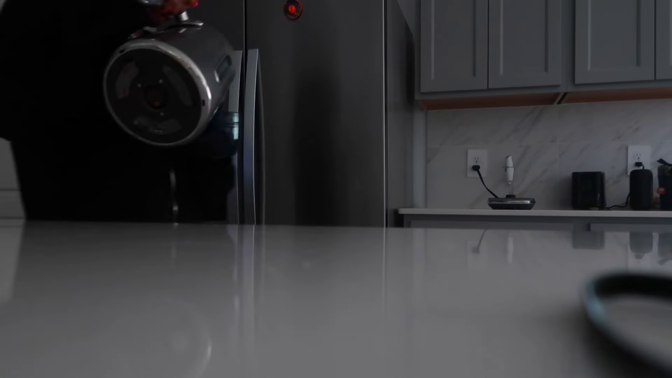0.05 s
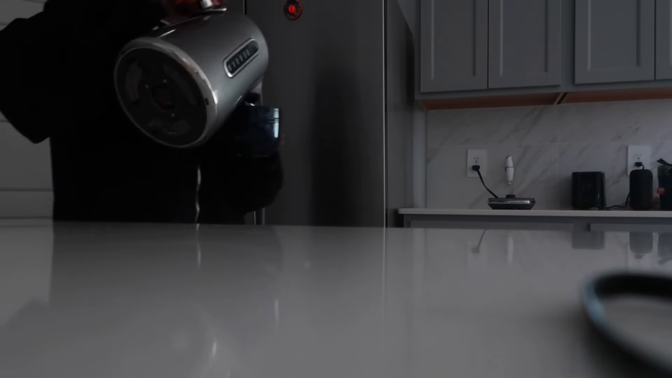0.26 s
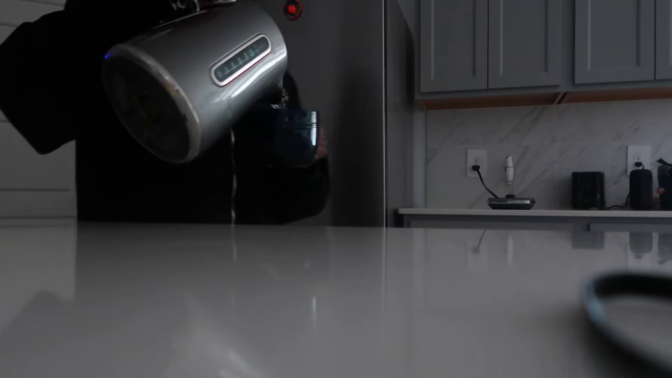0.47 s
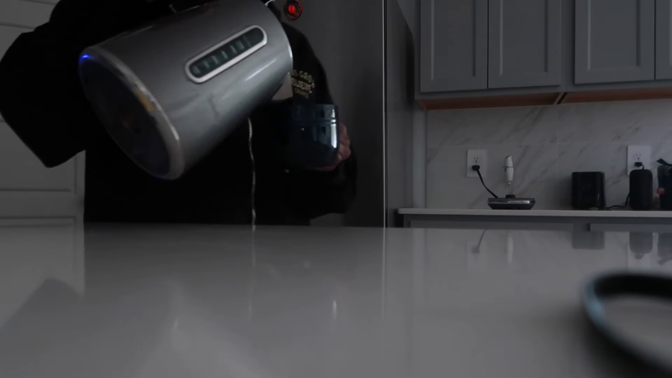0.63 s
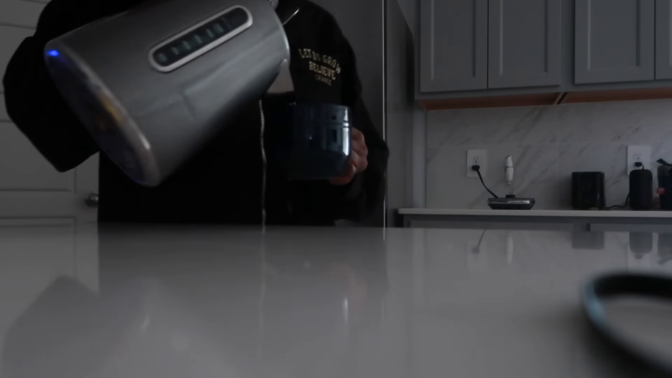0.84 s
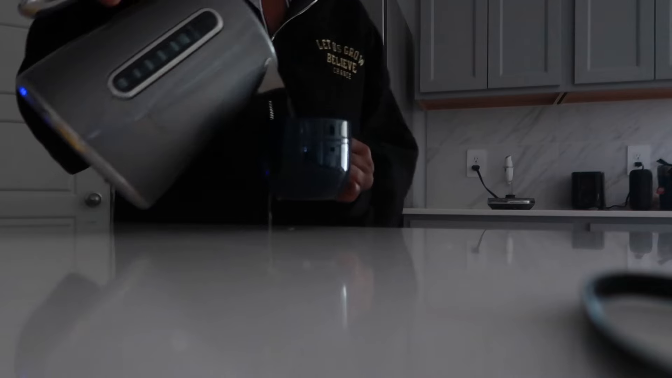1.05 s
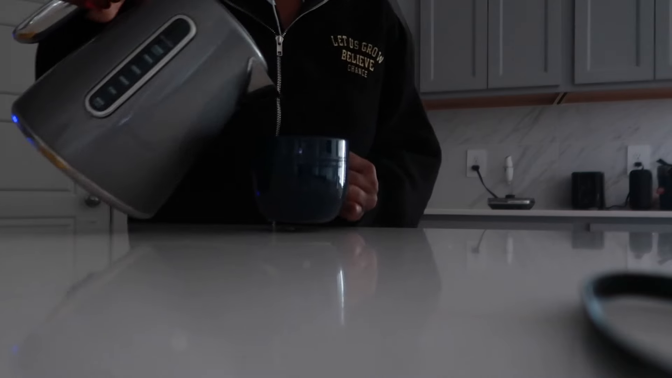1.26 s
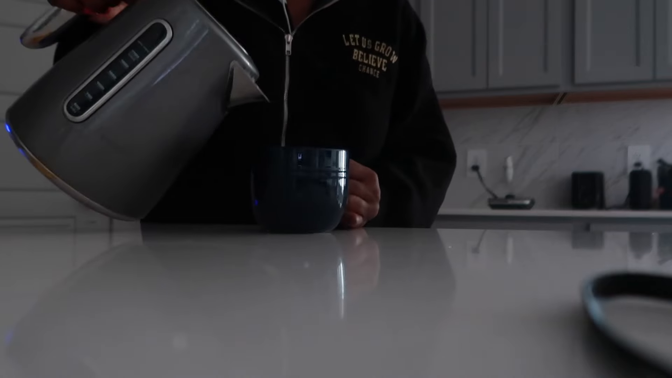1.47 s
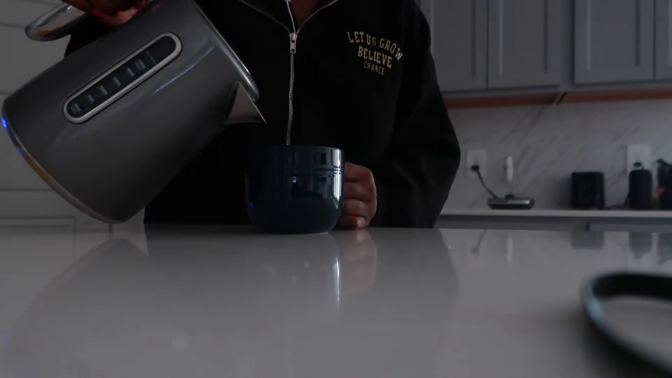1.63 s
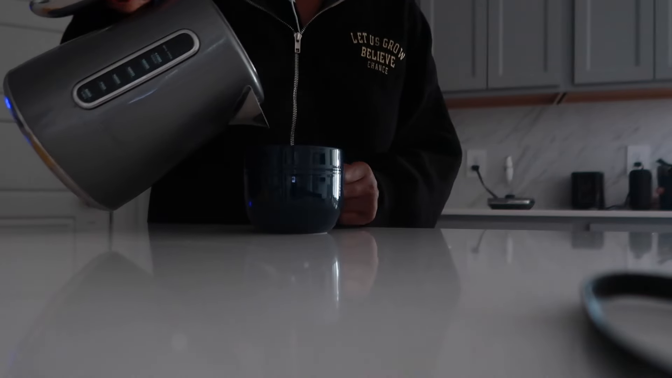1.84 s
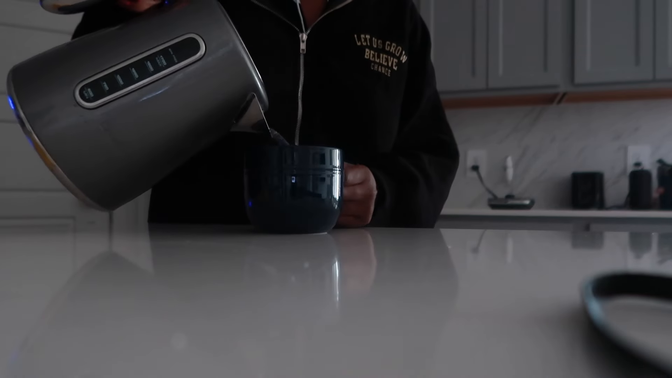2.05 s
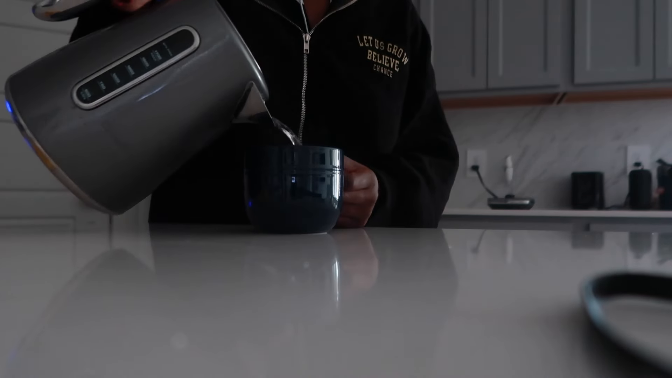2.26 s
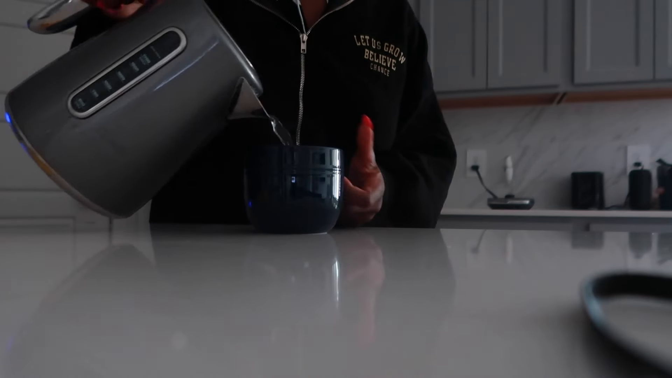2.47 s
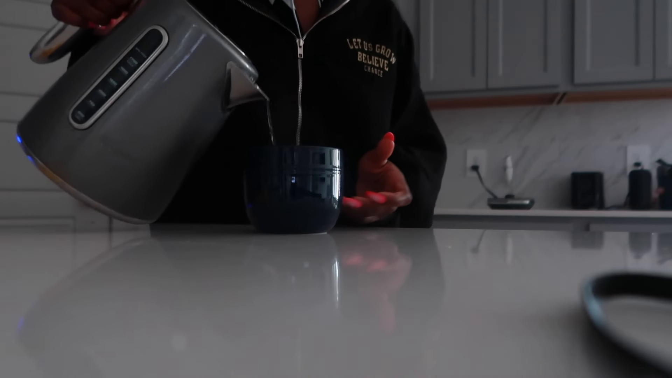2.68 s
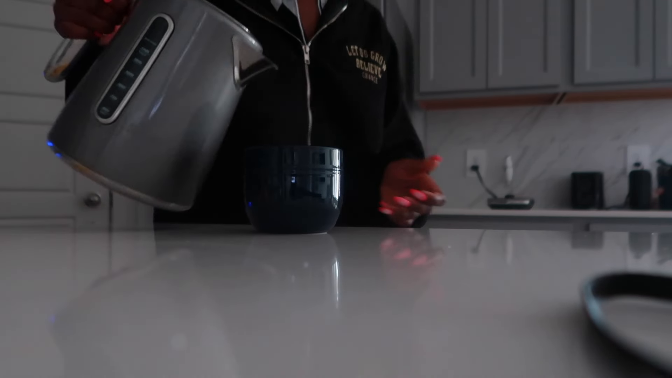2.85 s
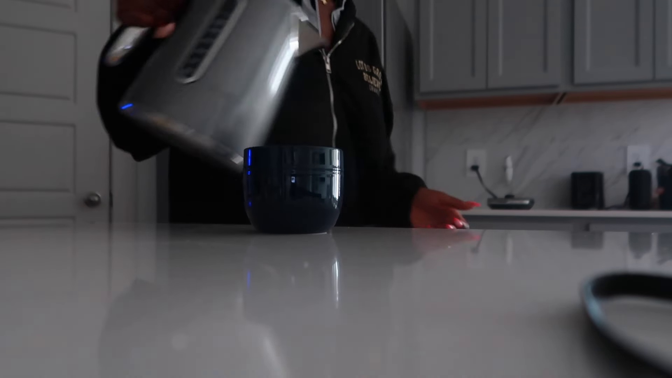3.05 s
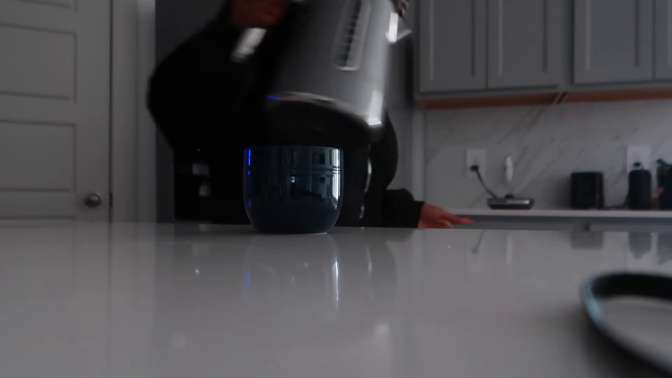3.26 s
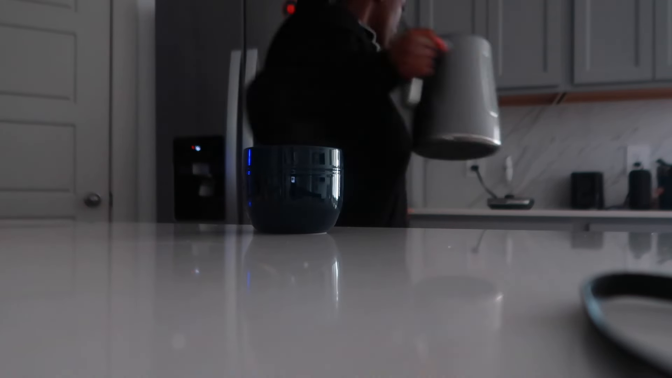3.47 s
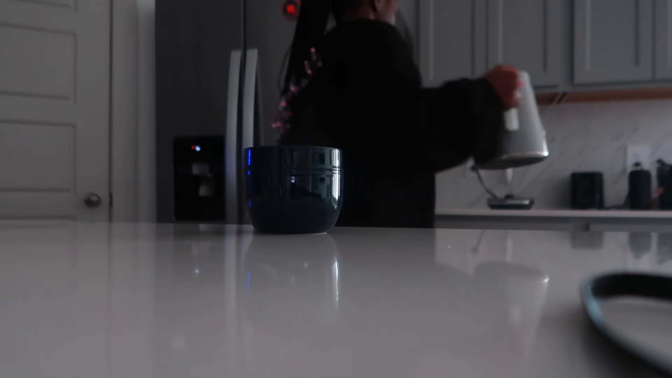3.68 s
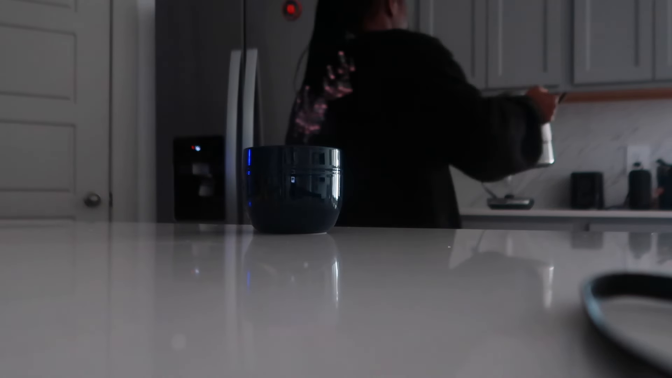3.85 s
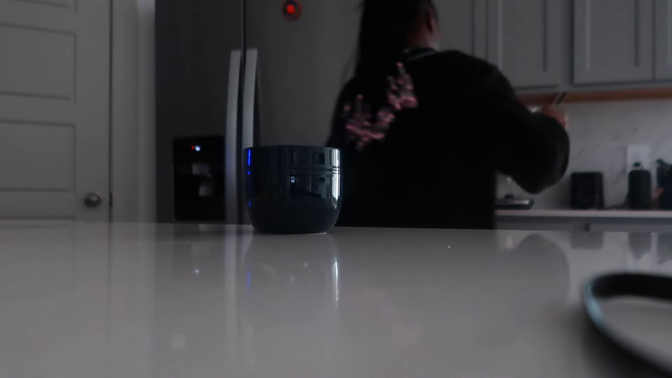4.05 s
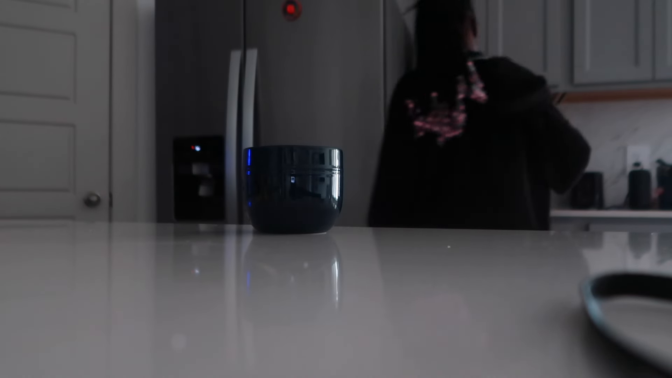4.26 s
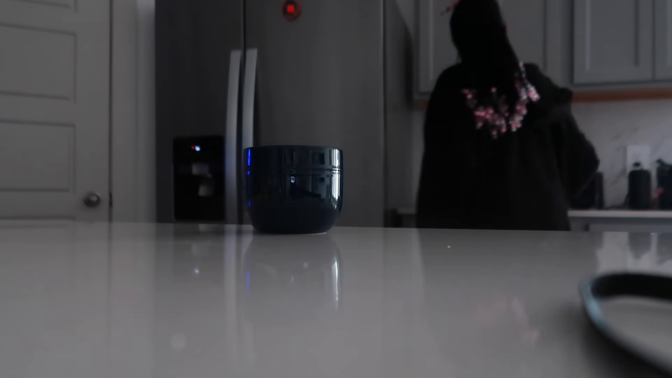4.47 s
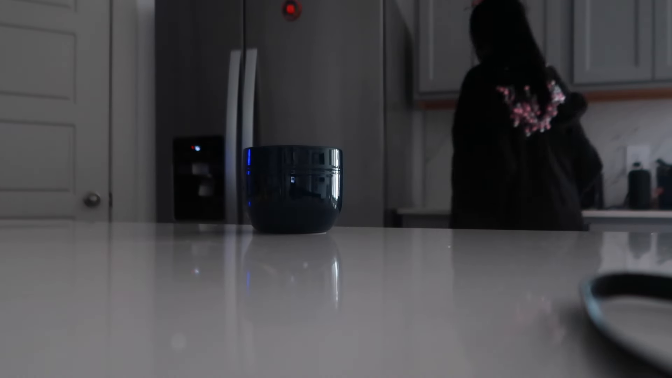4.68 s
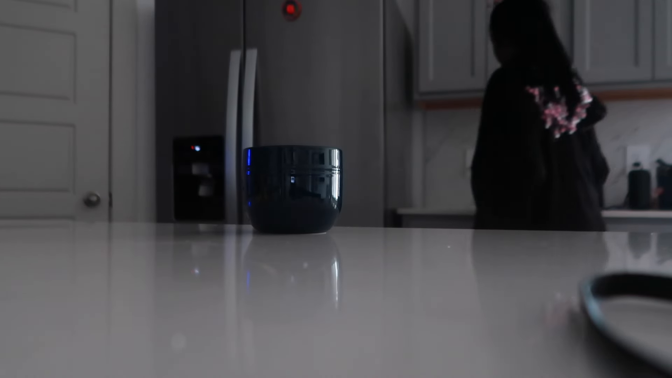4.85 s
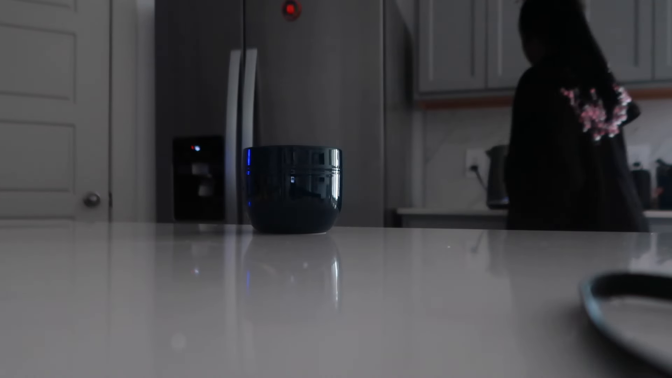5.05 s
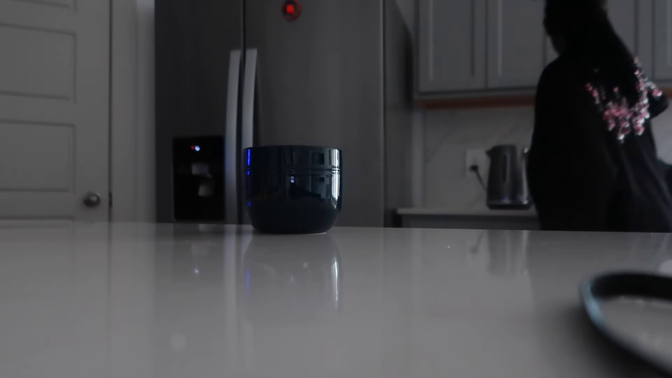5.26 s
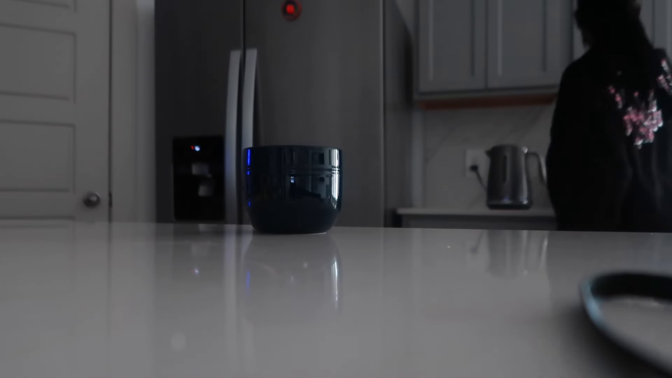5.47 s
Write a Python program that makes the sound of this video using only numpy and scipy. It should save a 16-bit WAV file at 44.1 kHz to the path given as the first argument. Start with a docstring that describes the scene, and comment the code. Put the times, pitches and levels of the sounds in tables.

```python
"""Water glugs in a tipped kettle and drips close by over room tone; the spout knocks a held mug, which lands
and rocks on a stone counter beside the microphone. More taps and drips follow, sleeves rustle, and the kettle
clatters onto its base across the hard-walled kitchen. Struck things are sums of decaying sines with coloured
noise bursts, bubbles are short gliding sines, cloth and rattle are grains and noise; a sparse echo tail makes
the room. A close microphone pair with gain control takes it all in."""
import sys
import numpy as np
from scipy import signal
from scipy.fft import rfft, irfft, next_fast_len
from scipy.io import wavfile
from scipy.ndimage import uniform_filter1d

SR = 44100
rng = np.random.default_rng(int(sys.argv[2]) if len(sys.argv) > 2 else 0)


def to_wav(sig):
    """Store sig (one row per channel, or 1-D mono) as 16-bit WAV at the path in sys.argv[1].

    Samples outside -1..1 are clipped; the rate is SR.
    """
    pcm = np.clip(np.atleast_2d(sig), -1, 1) * 32767
    pcm = np.round(pcm).astype(np.int16)
    wavfile.write(sys.argv[1], SR, pcm.T)  # frames by channels


N = 243431

# mug foot on the counter: (time [s], level [dB], contact [ms], ring level [dB])
LANDINGS = [(1.4031, -22, 0.023, -39), (1.4074, 12, 0.038, -2), (1.512, 0.5, 0.15, -9),
            (1.53, -6.5, 0.7, -38), (1.542, -8.5, 0.87, -33), (1.6056, -11.5, 0.96, -38),
            (1.634, -6, 0.42, -16.5), (1.652, -12.5, 0.52, -29), (1.681, -8, 0.42, -45),
            (1.691, -4, 0.16, -10.5), (1.7073, -1.5, 0.024, -12.5), (1.776, -19.5, 0.22, -31)]
# mug ringing freely: (frequency [Hz], level [dB], decay by 60 dB [s])
MUG_MODES = [(2051, -1, .28), (2239, 0, .37), (5235, -14, .26), (5577, -27, .9), (7900, -24, .3)]
# how far standing on its foot chokes each mug mode: (level [dB])
FOOT_DAMPS = [-25, 0, -25, -9, -25]


def amp(db):
    """Amplitude ratio of a level in dB."""
    return 10 ** (np.asarray(db, float) / 20)


def even(x):
    """Scale to an rms of 1."""
    return x / np.sqrt(np.mean(x ** 2) + 1e-20)


def peaked(x):
    """Scale to a peak of 1."""
    return x / abs(x).max()


def read(points, hz):
    """Read a table of (frequency, value) along a log frequency axis."""
    f, value = np.transpose(points)
    return np.interp(np.log(hz + 1), np.log(f + 1), value)


def curve(rows, column=1):
    """Gain along a dB column, silent outside its span."""
    rows = np.array(rows)
    return amp(np.interp(np.arange(N) / SR, rows[:, 0], rows[:, column], -200, -200))


def add(mix, s, sound):
    """Mix a sound in place, starting at s seconds."""
    part = mix[round(s * SR):][:len(sound)]
    part += sound[:len(part)]


def colour(x, spectrum):
    """Minimum-phase filter with the shape of the given dB spectrum, of energy 1."""
    hz = abs(np.fft.fftfreq(4096, 1 / SR))
    log_gain = np.log(amp(np.maximum(read(spectrum, hz), -100)))
    response = np.fft.ifft(np.exp(np.conj(signal.hilbert(log_gain)))).real[:2048]
    return signal.oaconvolve(x, response / np.linalg.norm(response))[:len(x)]


def ring(modes, extra_db=0, spread_db=0, shorten=1, flip=-1.055):
    """Decaying sines of alternate sign; the place of the blow shifts their balance."""
    hz, db, t60 = np.transpose(modes)[:, :, None]
    t = np.arange(SR // 2) / SR
    sign = flip ** np.arange(len(hz))[:, None]  # also lifts each next mode slightly
    db = db + np.reshape(extra_db, (-1, 1)) + spread_db * rng.standard_normal(hz.shape)
    decay = amp(db - 60 * t / (t60 * shorten))
    return peaked((sign * decay * np.sin(2 * np.pi * hz * t)).sum(0))


def soften(x, ms):
    """A blow lasts a while: longer contact rings the treble less."""
    return peaked(signal.lfilter([1], [1, -np.exp(-1000 / (SR * max(ms, .01)))], x))


def puff(t60, rise_s=0.000067, size=3000):
    """A short burst of noise that rises fast and decays."""
    t = np.arange(size) / SR
    return rng.standard_normal(size) * amp(-60 * t / t60) * (1 - np.exp(-t / rise_s))


def grains(per_s, spread_db):
    """Sparse clicks of uneven size."""
    size = amp(spread_db * np.minimum(rng.exponential(1, N), 4)) * rng.choice([-1, 1], N)
    return even(size * (rng.random(N) < per_s / SR))


def blow(t60, grit):
    """One sharp edge with a little grit behind it, nearly even across all pitches."""
    x = np.eye(1, 3000)[0] + grit * puff(t60)
    fade = amp(-9 * np.arange(3000) / (SR * t60))
    for _ in range(5):  # flatten the spectrum, then let it fade again
        z = rfft(x)
        x = irfft(z / (abs(z) + 1e-9)) * fade
    return x


def dying(x, t60):
    """Each value of x lingers and fades."""
    return signal.lfilter([1], [1, -amp(-60 / (t60 * SR))], x)


def pair(z, other, same):
    """Two channels that share the part `same` of their sound."""
    same = np.clip(same, -1, 1)[:, None]
    shared = np.sqrt((1 + same) / 2) * z
    rest = np.sqrt((1 - same) / 2) * other
    return np.array([shared + rest, shared - rest])


def air():
    """Room tone and microphone hiss: random short-time spectra with faint patches."""
    # room tone and hiss: (frequency [Hz], relative level [dB per Hz])
    tone = [(12, -40), (20, -17), (80, -0.5), (440, -7), (700, -10.5), (1130, -14), (2170, -18.5),
            (3540, -20.5), (7500, -28.5), (10000, -32), (12800, -44), (13400, -83)]
    # how alike left and right are: (frequency [Hz], likeness [-1 to 1])
    tone_same = [(40, 1), (130, 0.82), (290, 0.092), (1400, 0.035), (6000, 0.22), (9000, 1)]
    frames, hz = N // 256 + 5, np.fft.rfftfreq(1024, 1 / SR)
    a, b, c, d, patches = rng.standard_normal((frames, 513, 5)).T
    patches = even(uniform_filter1d(uniform_filter1d(patches, 12, 0), 14, 1))
    z = pair(a + 1j * b, c + 1j * d, read(tone_same, hz))
    z = z * amp(read(tone, hz)[:, None] + 0.64 * patches)
    return amp(-51.5) * even(signal.istft(z, nperseg=1024, noverlap=768)[1][:, :N])


def whine():
    """Faint electrical whine: thin steady sines in the treble."""
    # whine ahead of the gain control: (frequency [Hz], level [dB rms])
    tones = [(13006, -70), (13038, -78), (14236, -86), (14266, -88)]
    t = np.arange(N) / SR
    return sum(np.sqrt(2) * amp(db) * np.sin(2 * np.pi * hz * t) for hz, db in tones)


def trickle():
    """A bed of tiny bubbles between the drips: random grains ring short sines in 16 pitch bands."""
    # two spells of small bubbles: (time [s], level [dB])
    spells = [
        [(0.0, -60.5), (0.52, -57.5), (0.66, -52)],
        [(2.16, -57.5), (2.48, -60.5), (2.622, -58), (2.842, -51.5), (3.0, -67.5)],
    ]
    # balance of the bubble pitches: (frequency [Hz], relative level [dB per Hz])
    fizz = [(240, -42), (400, -34), (1090, -20), (2290, -17), (2380, -19), (2710, 5), (3050, -21.5),
            (5340, -20.5), (9000, -20), (11700, -69), (19800, -120)]
    bed, t = np.zeros(N), np.arange(900) / SR
    for hz in np.geomspace(550, 7000, 16):
        swell = 1 - np.exp(-t * hz * 4.5)
        bubble = np.sin(2 * np.pi * hz * t) * np.exp(-t * hz / 0.88) * swell
        band = even(signal.oaconvolve(grains(170, 3.5), bubble)[:N])
        bed += amp(read(fizz, hz)) * np.sqrt(hz) * band  # wider bands hold more power
    return even(bed) * sum(curve(rows) for rows in spells)


def glugs():
    """Water inside the tipped kettle: short hollow notes that swell, sag in pitch and stop."""
    # glugs: (time [s], length [s], peak [dB], starting pitch [Hz])
    gulps = [(.030, 0.013, -34.5, 950), (0.044, 0.012, -40.5, 860), (0.059, 0.016, -39, 960),
             (0.082, .009, -54, 905), (0.093, 0.015, -45, 930), (0.115, 0.012, -53, 1070),
             (0.14, 0.018, -48, 947), (0.162, 0.0075, -46, 930), (0.193, 0.038, -53, 900),
             (0.226, 0.026, -47, 910)]
    sag = 0.019  # share of the pitch lost over one glug
    out = np.zeros(N)
    for s, length, db, hz in gulps:
        u = np.arange(0, 1, 1 / (length * SR))
        turns = hz * length * (u - sag * u ** 2 / 2) + rng.random()
        add(out, s, amp(db) * np.sin(np.pi * u ** .6) * np.sin(2 * np.pi * turns))
    return out


def drips():
    """Each bubble is a dying sine that drops onto its pitch, then climbs; slap, hollow and splash go with it."""
    # bubbles and drips: (time [s], bubble peak [dB], pitch [Hz])
    drops = [(.254, -39, 765), (0.261, -42, 1200), (0.27, -43, 930), (0.28, -45.5, 1970), (.29, -43, 850),
             (0.333, -43, 1040), (0.354, -47, 1750), (0.387, -47, 2780), (.435, -60, 2700),
             (0.452, -43, 1208), (0.454, -53, 2700), (0.476, -31.5, 1500), (0.513, -47, 1490),
             (0.562, -43, 2670), (0.568, -47, 2004), (0.586, -40, 2730), (0.604, -38, 1430),
             (0.633, -44, 2770), (1.008, -46, 2860), (1.009, -50, 4840), (2.1731, -19.5, 1277),
             (2.176, -36, 397), (2.19, -49.5, 542), (2.183, -28, 5900), (2.23, -38, 1020),
             (2.253, -23, 1090), (2.288, -37, 980), (2.31, -53, 1100), (2.388, -29, 1092),
             (2.407, -29.5, 1070), (2.402, -45, 4150), (2.416, -40, 4500), (2.433, -35, 712),
             (2.45, -38, 693), (2.473, -38, 655), (2.529, -42, 4100), (2.529, -45, 5290),
             (2.54, -29.5, 950), (2.542, -40, 4450), (2.548, -35.5, 6340), (2.581, -36, 930),
             (2.584, -42, 4430), (2.613, -26.5, 975), (2.631, -37, 2640), (2.659, -54, 2800),
             (2.682, -47, 3470), (2.71, -40, 1000), (2.713, -55, 2700), (2.762, -44, 4940),
             (2.63, -25, 870), (2.657, -29, 980), (2.659, -27.5, 1560), (2.679, -34, 1600),
             (2.718, -31, 1054), (2.72, -24.5, 772), (2.74, -57, 807), (2.761, -33, 2600),
             (2.782, -38, 2620), (2.8312, -27.5, 3150)]
    rise = 0.023  # share of pitch gained per cycle as the bubble nears the surface
    cycles = 13  # until 60 dB down
    width = .8  # of the rough hollow around each bubble [octaves]
    out, splash, pushes = np.zeros((3, N))
    t = np.arange(6000) / SR
    for s, db, hz in drops:
        swell = 1 - np.exp(-t / 0.0033)
        drop_in = 0.24 * (1 - np.exp(-t / 0.00023))  # the pitch starts high for an instant
        turns = hz * t + rise * (hz * t) ** 2 / 2 + drop_in
        bubble = swell * amp(-60 * t * hz / cycles) * np.sin(2 * np.pi * turns)
        add(out, s, amp(db) * peaked(bubble))
        add(out, s, amp(db - 12.5) * tick())  # the slap of the drop
        hollow = [(hz / 2 ** width, -20), (hz, 0), (hz * 2 ** width, -12), (hz * 4 ** width, -40)]
        add(out, s, amp(db - 8) * peaked(colour(puff(.03, rise_s=0.0025), hollow)))
        burst = amp(db) * puff(0.027, rise_s=0.00091)
        add(splash, s, amp(-8.5) * burst)
        # only the larger, lower drops ring the mug, once it has landed
        add(pushes, s, (hz < 2000 and s > LANDINGS[0][0]) * burst)
    wall = amp(-47) * signal.oaconvolve(pushes, ring(MUG_MODES, FOOT_DAMPS))[:N]
    splash = colour(splash, [(200, -24.0), (500, 10.0), (1500, 10.5), (3000, 2.0),
                             (5000, -12), (7500, -13.5), (12000, -24), (15000, -44.0)])
    return out + splash + wall


def tick():
    """A blow on hard glaze: one sharp edge, coloured."""
    # hard edge on glaze: (frequency [Hz], relative level [dB per Hz])
    glaze = [(300, -18.5), (1500, -10.5), (2500, -1), (4000, -1), (5000, -3), (8000, -17), (12000, -16),
             (16000, -29.5)]
    return peaked(colour(blow(0.0096, grit=.15), glaze))


def small_body(x):
    """A mug is too small to push deep bass."""
    return signal.lfilter(*signal.butter(2, 130, "high", fs=SR), x)


def taps():
    """Taps ring the mug and the kettle wall. Returns the clacks and the bright part."""
    # spout or finger on the mug:
    # (time [s], clack level [dB], ring level [dB], lowest mode [dB], tick level [dB])
    touches = [(0.6723, -2, -20.5, -10, -29), (2.1751, -32, -58, -21, -24.5), (2.29, -63, -52, -23, -55),
               (2.392, -47, -47, -20, -51), (2.6007, -29, -22.5, 2.5, -20.5)]
    # kettle wall: (frequency [Hz], level [dB], decay by 60 dB [s])
    shell = [(188, -5, 0.055), (211, -2, 0.11), (266, -1.5, 0.06), (288, 4.5, 0.075), (390, 0, 0.055),
             (466, 4.5, 0.059), (500, 3, 0.05), (700, 6, 0.05), (864, 4, 0.015), (950, 3.5, .04),
             (1202, -2, 0.04), (1485, -9.5, 0.045), (2594, -8, 0.05)]
    # steel on glaze: (frequency [Hz], relative level [dB per Hz])
    clack = [(90, -53), (150, -7.5), (300, 6.5), (780, 1), (1190, 0), (1820, -8), (2500, -3), (4000, -13),
             (7100, -23), (12000, -40), (16000, -53)]
    # a tap on the rim misses one upper mode: (level [dB] of each mug mode)
    rim_damps = np.array([0, 0, 0, -18, 0])
    # a hand holds the mug up: (level [dB] of each mug mode)
    hand_damps = np.array([0, 0, -25, -25, -25])
    hand_shortens = .55  # share of the ring time left in the hand
    out, bright = np.zeros((2, N))
    for s, clack_db, ring_db, lowest_db, tick_db in touches:
        held = s < LANDINGS[0][0]
        balance = rim_damps + hand_damps * held + [lowest_db, 0, 0, 0, 0]
        add(bright, s, amp(tick_db) * tick())
        add(bright, s, amp(ring_db) * ring(MUG_MODES, balance, shorten=hand_shortens ** held))
        add(out, s, amp(clack_db - 6.5) * ring(shell))
        add(out, s, amp(clack_db) * peaked(colour(blow(0.034, grit=0.3), clack)))
    return small_body(out), bright


def landings():
    """The mug foot thuds into the stone, rings and cracks. Returns the thuds and the bright part."""
    # stone counter: (frequency [Hz], level [dB], decay by 60 dB [s])
    counter = [(230, -6.5, .05), (393, -2.5, 0.06), (491, -0.5, 0.036), (540, -3.5, 0.019),
               (681.6, -0.5, 0.13), (770, 5.5, .05), (856, 0, 0.045), (998, -3.5, 0.02),
               (1226, -2.5, 0.065), (1405, 4, 0.018), (2003, 2.5, 0.04), (2700, -7, .02)]
    # the whole counter shakes the microphone: (frequency [Hz], level [dB], decay by 60 dB [s])
    slab_modes = [(45, 0, .03), (85, -4, .06), (141.5, -5.5, 0.088)]
    # the counter's dense upper modes, merged: (frequency [Hz], relative level [dB per Hz])
    thud = [(60, -40), (150, -7.5), (220, -12.5), (390, 0.5), (755, 2.5), (1840, 4), (2500, 0),
            (3500, -15.5), (4300, -26), (6000, -33), (12000, -41.5)]
    foot_shortens = .5  # share of the ring time left while the foot is on the counter
    crack_db, crack_fall_db = -22.5, 20.5  # crack at 0.1 ms contact, and its fall for ten times longer
    out, bright, slab = np.zeros((3, N))
    for s, db, ms, ring_db in LANDINGS:
        longer = np.log10(max(ms, .005) * 10)
        foot_ring = ring(MUG_MODES, FOOT_DAMPS, shorten=foot_shortens)
        add(bright, s, amp(ring_db) * soften(foot_ring, 2 * ms))
        add(out, s, amp(db - 3.0) * soften(ring(counter, spread_db=3.0), ms))
        add(slab, s, amp(db - 36) * ring(slab_modes, spread_db=1.5))
        rattle = 5 * blow(.035, grit=.5)
        add(out, s, amp(db + 6.0) * soften(colour(rattle, thud), ms))
        add(bright, s, -amp(db + crack_db - crack_fall_db * longer) * tick())
    return small_body(out) + slab, bright


def cloth():
    """Fibres slip in dense grains under each stroke, with a few sharper snaps."""
    # sleeves and hair, each stroke swelling to its end: (start [s], length [s], level [dB])
    strokes = [(3.146, 0.35, -54), (3.691, 0.08, -62.5), (3.881, 0.25, -58), (4.133, 0.0088, -47.5),
               (4.186, 0.086, -52.5), (4.285, 0.057, -49.5)]
    # rustle: (frequency [Hz], relative level [dB per Hz])
    fabric = [(400, -0.5), (900, -32), (1800, 1), (4000, 1), (7200, -1.5), (9000, -14.5), (13000, -6.5),
              (15500, -33)]
    # cloth snaps: (time [s], level [dB], pitch [Hz])
    snap_rows = [(3.699, -42, 4000), (3.895, -44.5, 6600), (3.979, -39.5, 6980), (4.0805, -33, 3500),
                 (4.134, -40, 3000), (4.149, -32.5, 2000), (4.1952, -31, 5500), (4.235, -32.5, 5000),
                 (4.258, -41, 3600), (4.2729, -28, 3800), (4.311, -27, 4000), (4.337, -32, 3500),
                 (4.343, -33, 3030), (4.365, -24, 4470), (4.385, -34, 4970), (4.41, -48, 2500),
                 (4.4475, -36, 3500)]
    stroke_swell_db, stroke_t60 = 10.5, 0.33  # rise over a stroke [dB], decay after it [s]
    snap_width = 2.4  # reach below the pitch [octaves]
    t, level, snaps = np.arange(N) / SR, np.zeros(N), np.zeros(N)
    for s, length, db in strokes:
        swell_db = stroke_swell_db * np.minimum((t - s) / length - 1, 0)
        fade_db = -60 * np.maximum(t - s - length, 0) / stroke_t60
        level += (t > s) * amp(db + swell_db + fade_db)
    slips = (rng.standard_normal(N) + .5 * grains(900, 5)) * level
    for s, db, hz in snap_rows:
        band = [(hz / 2 ** snap_width, -18), (hz, 0), (max(hz, 6500) * 1.34, -8), (10500, -40), (16000, -60)]
        add(snaps, s, amp(db - 3.0) * peaked(colour(puff(0.03, rise_s=0.001), band)))
    return colour(slips, fabric) + snaps


def kettle():
    """Knocks ring the base and leave it rattling in uneven slips; grit adds the treble. Returns both."""
    # the kettle knocking on its base as it rocks: (time [s], peak [dB], grit level [dB])
    knocks = [(4.488, -19, -6.5), (4.494, -8, -10.5), (4.504, -13.5, -36), (4.52, -17.5, -23),
              (4.539, -17, -38), (4.566, -24, -23), (4.62, -16, -42), (4.679, -17, -27.5),
              (4.692, -14.5, -32), (4.715, -17, -18), (4.731, -9.5, -31.5), (4.754, -18.5, -40),
              (4.79, -39, -49), (4.843, -22, -49), (4.893, -17, -21.5), (4.905, -16, -24), (4.922, -36, -8),
              (4.931, -6.5, -11.5), (4.964, -13, -28), (4.997, -14.5, -20), (5.012, -29, -14.5),
              (5.035, -17, -40), (5.067, -21, -55), (5.099, -20.5, -49), (5.13, -31.5, -46)]
    # base and worktop at rest: (frequency [Hz], level [dB], decay by 60 dB [s])
    base = [(41.7, -8, 0.11), (86, -3.5, 0.19), (125, -4.5, 0.15), (176, -7, 0.12), (235, -4, 0.03),
            (283, 0, 0.037), (331, 7.5, 0.041), (359, 4, 0.028), (383, 0.5, 0.029), (416, -1, 0.037),
            (495, -7.5, 0.033), (603, 0.5, 0.021), (704, -0.5, 0.026), (782, -2, 0.036), (1030, -4, 0.028)]
    # grit: (frequency [Hz], relative level [dB per Hz])
    grit_spectrum = [(240, -34), (400, -1.5), (800, -9), (1560, -8.5), (3000, -14), (5650, -23.5),
                     (7300, -23), (9000, -30), (13300, -35.5), (15500, -67)]
    knock_ms, grit_per_contact_db = 0.51, 80.5  # a knock with this much less grit touches ten times longer
    weight_db, rumble_db = -17, 7  # the worktop's lowest modes in a single knock, and in the rattle
    rattle_db, rattle_t60, scrape_db, scrape_t60 = -19.5, 0.3, -39, 0.79  # what each knock leaves shaking
    out, grit, blows, scrapes = np.zeros((4, N))
    lowest = np.array(base)[:, 0] < 200
    give = 1 - np.exp(-np.arange(SR // 2) / (0.003 * SR))  # the base gives for 3 ms before it rings
    for s, db, grit_db in knocks:
        # each tilt of the kettle shifts each mode, 4 % down to 3.5 % up
        shift = .035 * rng.uniform(-1.15, 1, (len(base), 1))
        tilted = np.array(base) * (1 + shift * [1, 0, 0])
        ms = knock_ms * 10 ** ((db - grit_db) / grit_per_contact_db)
        knock = soften(ring(tilted, weight_db * lowest, spread_db=3.5), ms)
        add(out, s, amp(db) * peaked(give * knock))
        add(grit, s, amp(grit_db) * puff(0.064, rise_s=0.0059))
        add(blows, s, amp([db + rattle_db]))
        add(scrapes, s, amp([grit_db + scrape_db]))
    rumble = ring(base, rumble_db * lowest, shorten=0.35)
    rattle = even(signal.oaconvolve(grains(400, 3.5), rumble)[:N])
    out += dying(blows, rattle_t60) * rattle
    slips = even(rng.standard_normal(N) + .8 * grains(1500, 4.5))
    return out, colour(grit + dying(scrapes, scrape_t60) * slips, grit_spectrum)


def room(x, gap_s=0.0055):
    """Hard walls: sparse echoes of random sign, each band dying at its own speed."""
    # echo tail: (frequency [Hz], decay by 60 dB [s])
    tail_t60 = [(100, 0.26), (300, 0.71), (800, 1), (2000, 0.96), (5000, 0.72), (9000, 0.13), (14000, 0.46)]
    # echo tail: (frequency [Hz], relative level [dB])
    tail_colour = [(60, 1.5), (200, 9), (800, 1.5), (2500, -2), (4000, -0.5), (7500, 7), (11000, -18.5),
                   (15000, -28.5)]
    # how alike left and right are: (frequency [Hz], likeness [-1 to 1])
    tail_same = [(60, .998), (300, 1), (1400, 1), (3000, 1), (6000, 0.39), (9000, 0.57)]
    echoes = np.zeros((2, SR))
    at = np.arange(round(gap_s * SR), SR - 20, 20)
    at = at + rng.integers(0, 20, (2, len(at)))
    np.put_along_axis(echoes, at, rng.choice([-1., 1.], at.shape), 1)
    hz, t, z = signal.stft(echoes, SR, nperseg=256)
    z = z * amp(read(tail_colour, hz)[:, None] - 60 * t / read(tail_t60, hz)[:, None])
    tail = signal.istft(pair(*z, read(tail_same, hz)), SR, nperseg=256)[1]
    return signal.fftconvolve(x[None], tail / np.linalg.norm(tail[0]), axes=1)[:, :N]


def scene():
    """Mug, water and cloth close to the microphone, kettle base far off, all answered by the walls."""
    wet = trickle() + glugs() + drips()
    tap_clacks, tap_bright = taps()
    thuds, landing_bright = landings()
    near, bright = tap_clacks + thuds, tap_bright + landing_bright
    soft = cloth()
    far, grit = kettle()
    near_walls = room(amp(-14.5) * near + amp(-17.5) * bright + amp(-12.5) * wet + amp(-7) * soft)
    far_walls = room(amp(-10.5) * far + amp(-5) * grit)
    add(near, 0.022, amp(-22) * bright)  # the far wall throws the bright part back after 22 ms
    return near + bright + wet + soft + far + grit + near_walls + far_walls + air()


def record(dry):
    """Port pair, the recorder's own whine, gain control that ducks after loud blows, overload, band limit."""
    # close ports drift towards opposite phase in the treble: (frequency [Hz], left lead [rad])
    port_lead = [(200, 0), (1000, .3), (6000, .4), (7200, .8), (8100, 1.9), (9000, 2.2), (16000, 2.3)]
    # port balance: (frequency [Hz], left over right [dB])
    port_balance = [(150, 0), (500, 1), (1000, .2), (2000, -.7), (8000, -.4), (12000, 0)]
    size = next_fast_len(N)
    hz = np.fft.rfftfreq(size, 1 / SR)
    left = np.exp(.5j * read(port_lead, hz)) * amp(read(port_balance, hz) / 2)
    x = irfft(rfft(dry, size) * np.array([left, 1 / left]), size)[:, :N]
    x = x + np.outer([1, -1], whine())  # opposite in the two channels
    power = uniform_filter1d((x ** 2).mean(0), 4000, origin=1999)  # over the last 91 ms
    power_db = 10 * np.log10(abs(power) + 1e-12)
    fall = np.arange(N) * 8. / SR  # the held level sinks 8 dB a second
    held_db = np.maximum.accumulate(power_db + fall) - fall
    over_db = np.maximum(held_db + 17.5, 0)
    x = np.clip(x / amp(.6 * over_db), -1, 1)  # 0.6 dB down for each dB over
    band_limit = signal.firwin(255, 16300, window=("kaiser", 9), fs=SR)
    return signal.oaconvolve(x, band_limit[None], "same")


dry = scene()
out = record(dry)
to_wav(out)
```